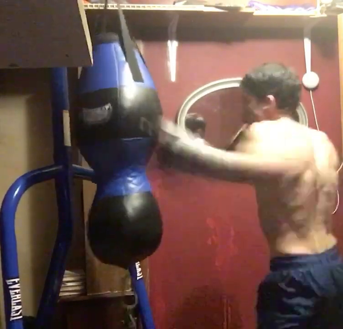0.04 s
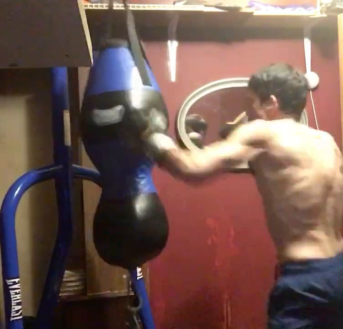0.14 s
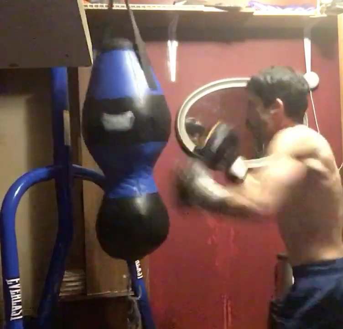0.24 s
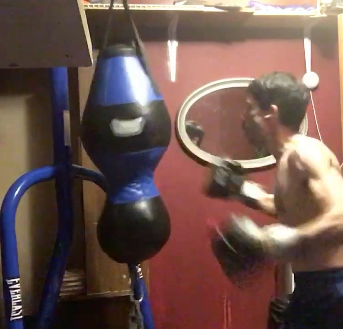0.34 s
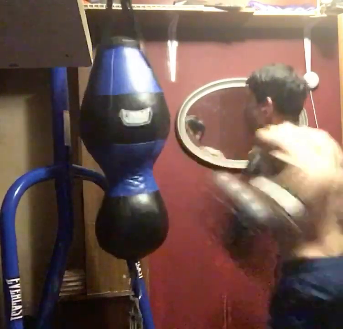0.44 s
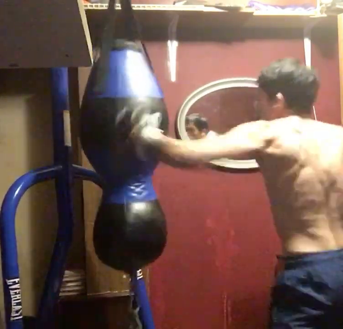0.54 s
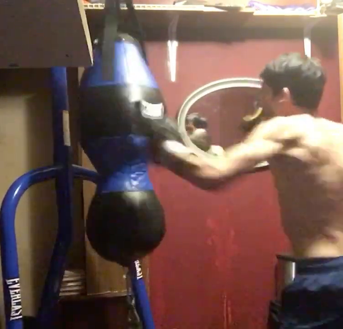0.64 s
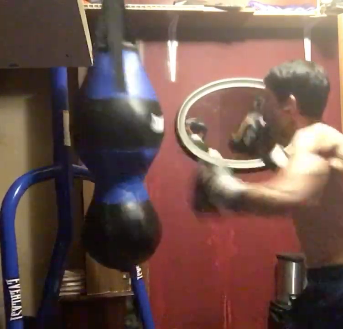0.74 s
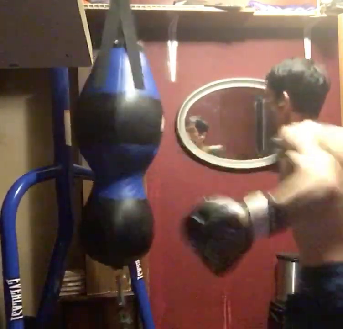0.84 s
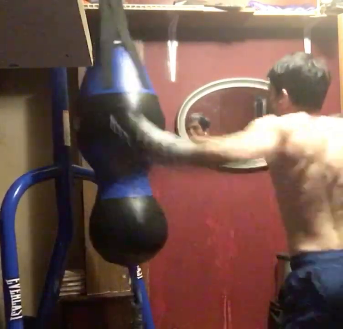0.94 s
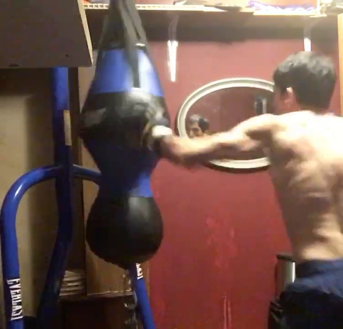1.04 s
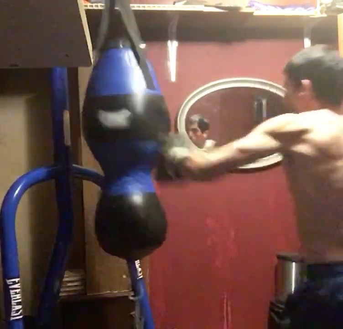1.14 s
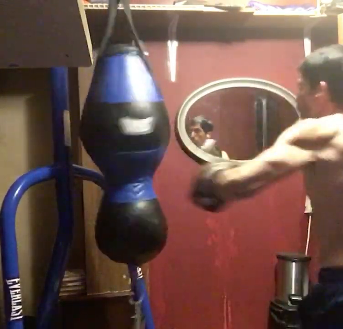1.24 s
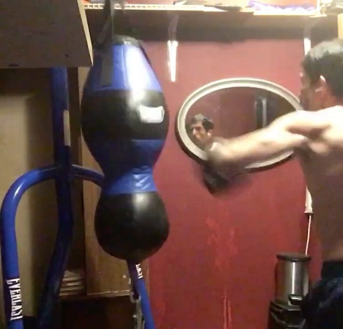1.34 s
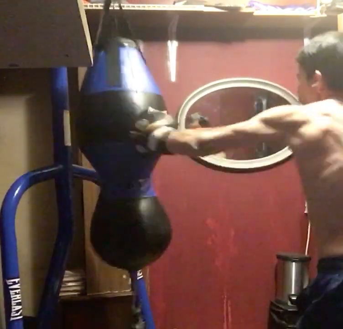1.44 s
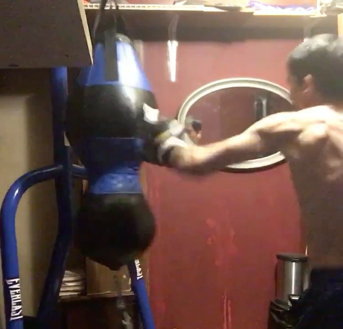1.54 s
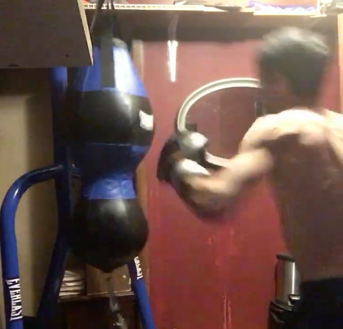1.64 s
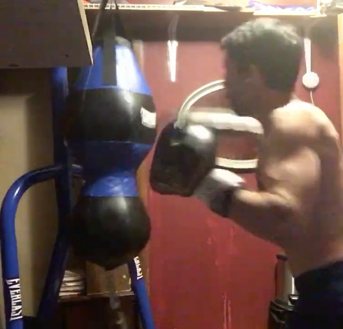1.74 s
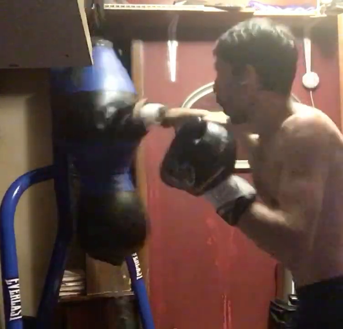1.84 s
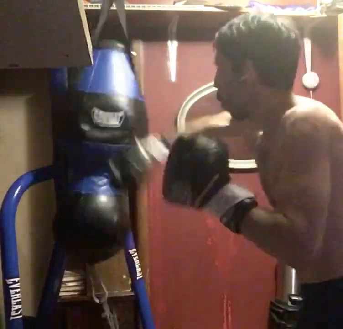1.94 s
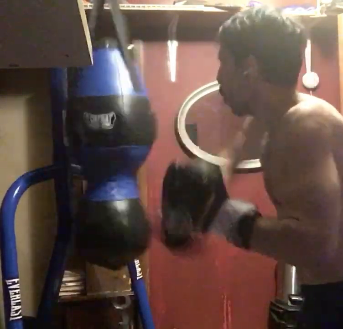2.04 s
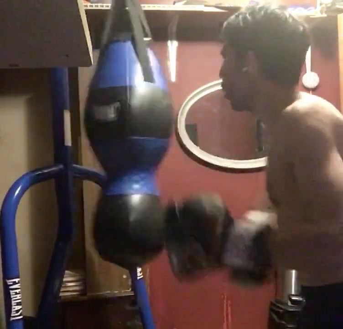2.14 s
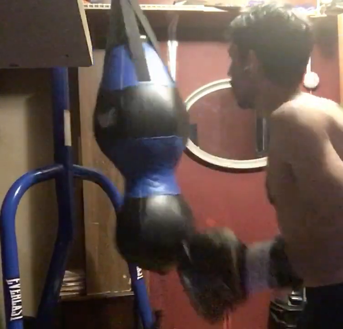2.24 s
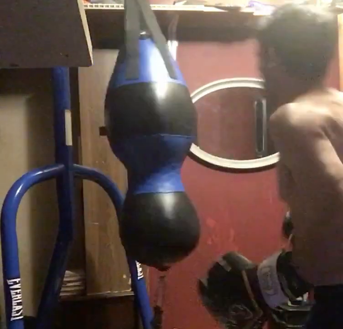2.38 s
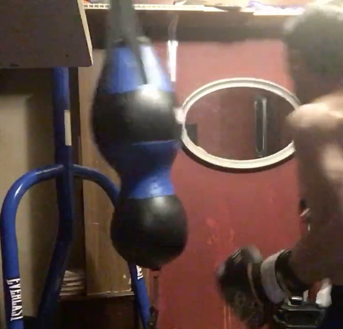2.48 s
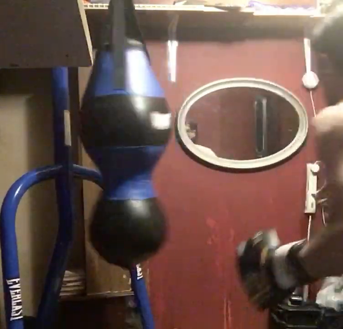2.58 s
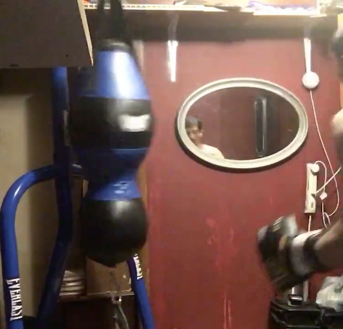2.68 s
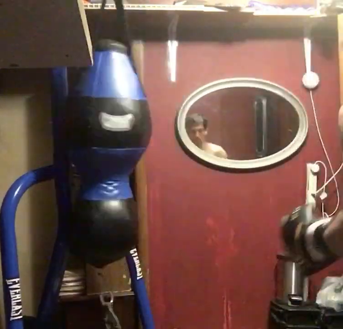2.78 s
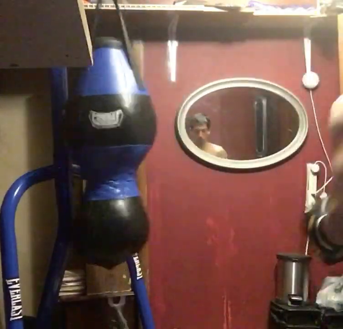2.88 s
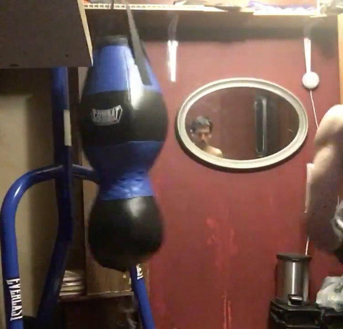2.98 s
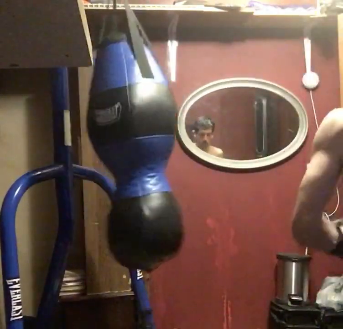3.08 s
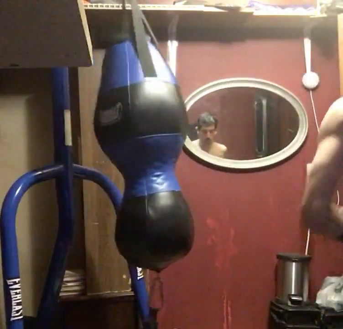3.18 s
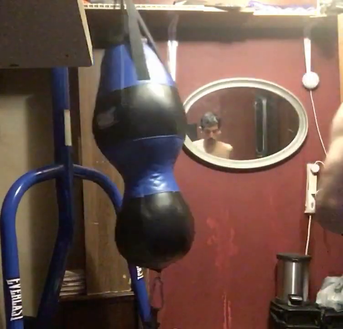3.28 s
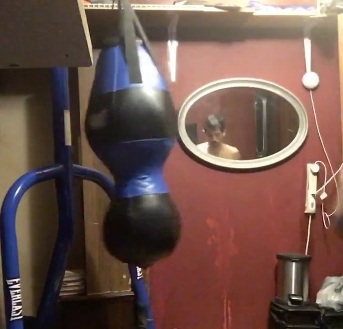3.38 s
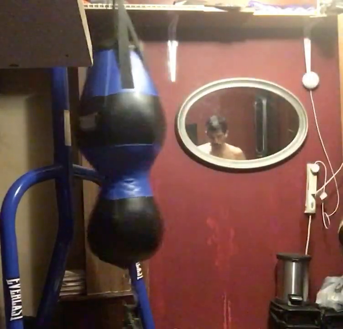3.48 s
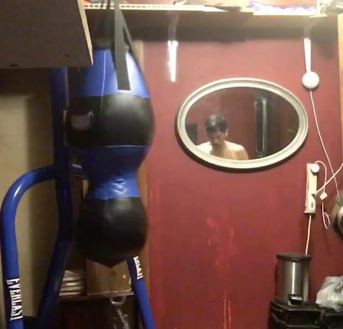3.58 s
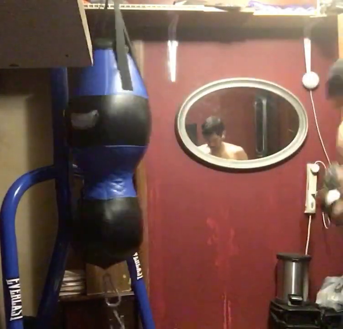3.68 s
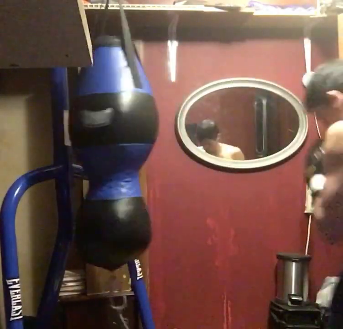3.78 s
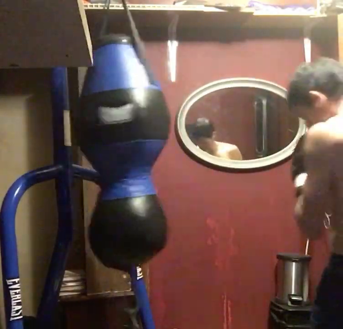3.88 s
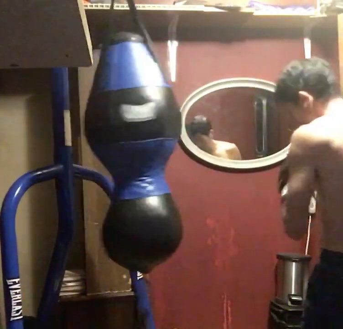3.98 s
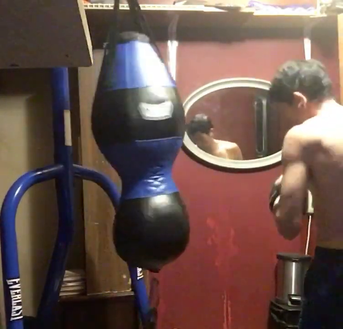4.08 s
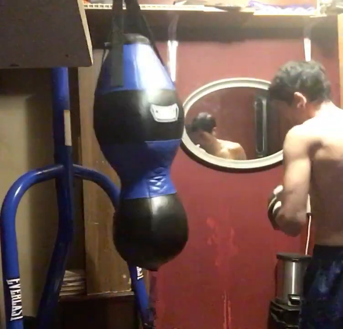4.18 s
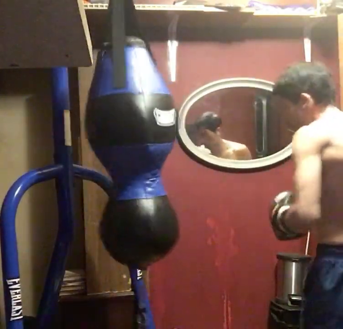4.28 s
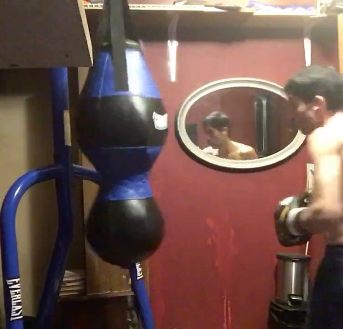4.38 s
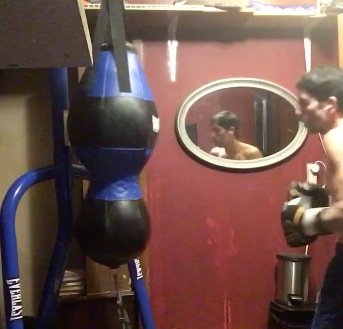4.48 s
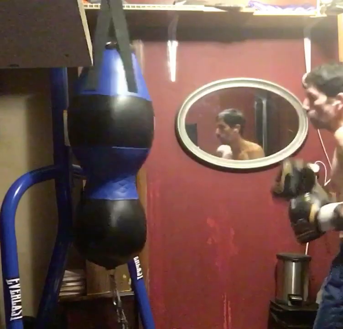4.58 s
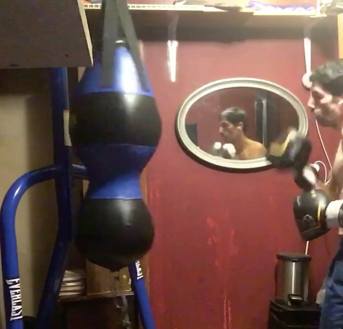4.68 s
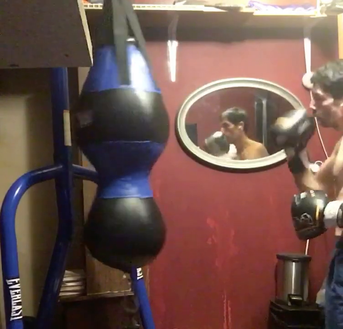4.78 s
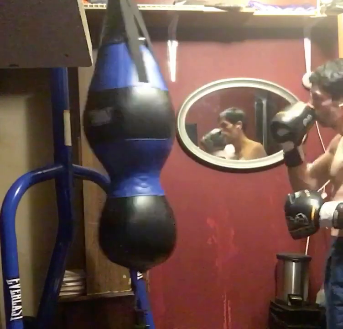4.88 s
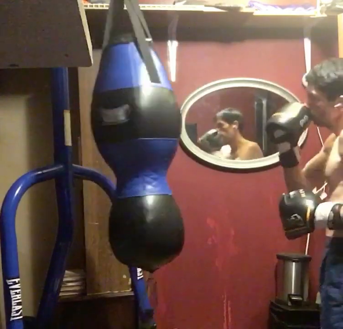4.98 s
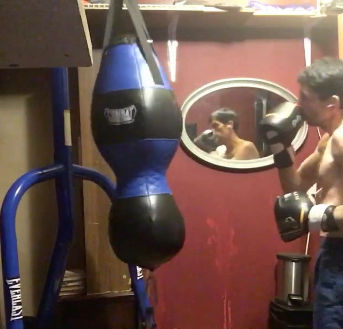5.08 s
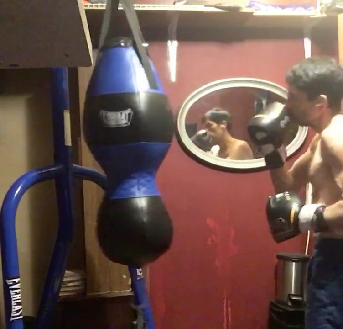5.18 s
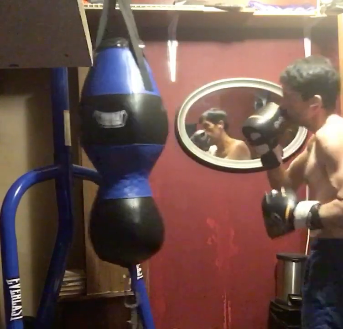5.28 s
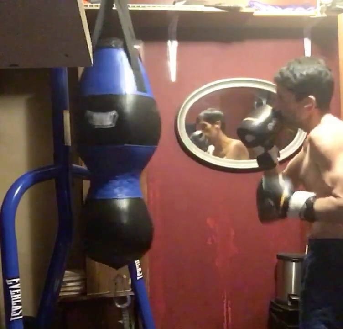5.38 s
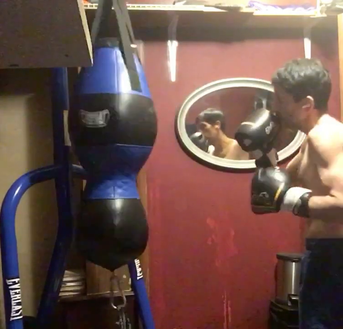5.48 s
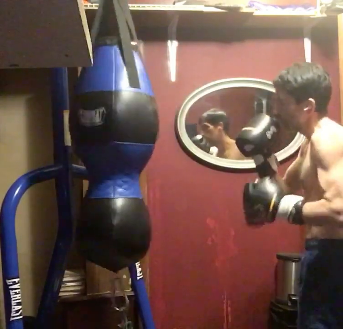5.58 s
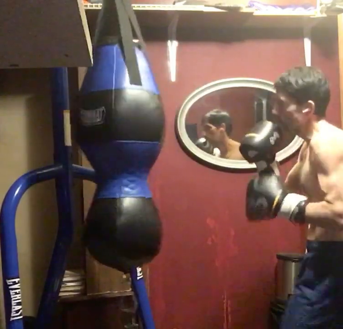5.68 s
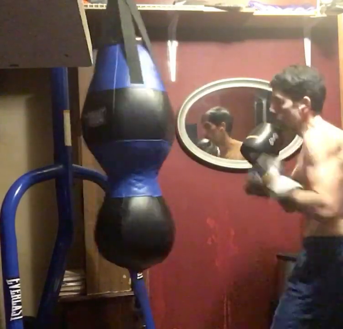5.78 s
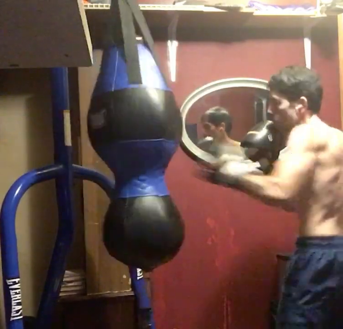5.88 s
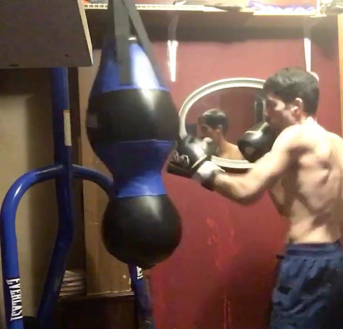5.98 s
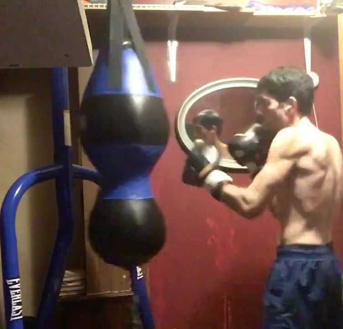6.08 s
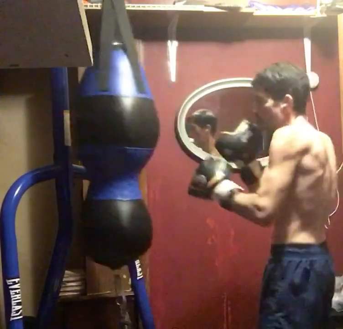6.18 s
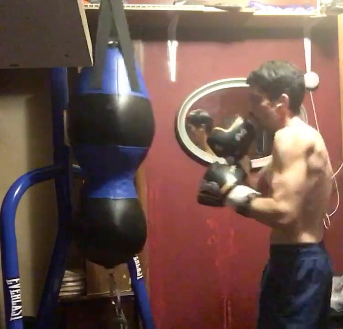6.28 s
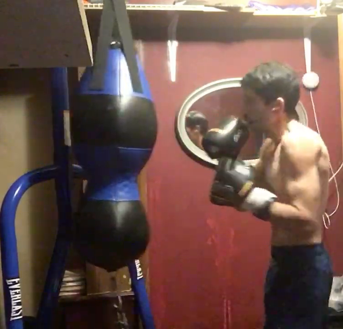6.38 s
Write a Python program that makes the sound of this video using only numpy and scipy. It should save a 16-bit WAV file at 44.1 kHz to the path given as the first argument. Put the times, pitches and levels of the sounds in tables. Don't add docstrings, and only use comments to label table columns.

```python
import sys
import numpy as np
from scipy import signal
from scipy.fft import rfft, irfft
from scipy.io import wavfile

SR = 44100
rng = np.random.default_rng(int(sys.argv[2]) if len(sys.argv) > 2 else 0)


def pcm_store(signal):
    levels = np.round(np.clip(np.atleast_2d(signal), -1, 1) * 32767)
    wavfile.write(sys.argv[1], SR, levels.astype(np.int16).T)


def level_to_linear(level):
    exponent = np.asarray(level, float) / 20
    return 10 ** exponent


N = 283563
EDGE_HZ = 15800


def evened(x):
    return x / np.sqrt(np.mean(x ** 2) + 1e-20)


def read(points, hz):
    f, value = np.transpose(points)
    return np.interp(np.log(hz + 1), np.log(f + 1), value)


def add(mix, s, sound):
    part = mix[round(s * SR):][:len(sound)]
    part += sound[:len(part)]


def coloured(x, *spectra):
    hz = np.fft.rfftfreq(len(x), 1 / SR)
    gain_db = sum(read(s, hz) for s in spectra)
    return evened(irfft(rfft(x) * level_to_linear(gain_db), len(x)))


def wander(size, hz):
    noise = rng.standard_normal(size + 2000)
    slow = signal.lfilter([1], [1, -np.exp(-2 * np.pi * hz / SR)], noise)
    return evened(slow[2000:])


def crackle(size, spread_db):
    return rng.standard_normal(size) * level_to_linear(spread_db * wander(size, 390))


def ring(modes, seconds):
    t = np.arange(round(seconds * SR)) / SR
    return sum(level_to_linear(db - 60 * t / t60) * np.sin(2 * np.pi * (hz * t + rng.random())) for hz, db, t60 in modes)


def stroke(length, level_db, peak, rise_db, fade_db):
    u = np.linspace(0, 1, round(length * SR))
    return u, level_db - np.interp(u, [0, peak, 1], [rise_db, 0, fade_db])


# (pitch [Hz], level [dB per Hz])
HUM_COLOUR = [(15, -35.5), (25, 5.5), (66, 5), (117, 2), (175, -15.5), (249, -2.5), (516, -14.5),
              (677, -16.5), (988, -23.5), (1290, -19), (1940, -18), (4610, -22.5), (7510, -29.5),
              (14400, -24), (16000, -33.5)]


def house_hum():
    level_db = -59 + 2.7 * wander(N, 1)
    return level_to_linear(level_db) * coloured(rng.standard_normal(N), HUM_COLOUR)


# (time [s], effort [dB])
EFFORT = [(0, -39), (.55, -43.5), (.86, -44), (1.15, -49), (1.48, -51), (1.72, -66), (1.86, -43.5),
          (2.15, -46.5), (2.5, -55.5), (2.75, -49.5), (2.93, -56), (3.4, -53.5), (4.05, -66.5), (4.6, -67),
          (5.2, -54), (5.75, -62), (6.0, -60), (6.43, -70.5)]
# (pitch [Hz], level [dB per Hz])
CLOTH_COLOUR = [(88, -24), (150, -4), (522, -9.5), (710, -4.5), (787, -10), (1420, -8.5), (1870, -14),
                (5000, -18), (6500, -51), (11000, -120)]
# (pitch [Hz], level [dB per Hz])
RUSTLE_COLOUR = [(1500, -30), (3000, 3), (5000, 3.5), (6500, 2), (10500, -2), (13000, -2.5), (16000, 1)]


def moves():
    t = np.arange(N) / SR
    effort_db = np.interp(t, *np.transpose(EFFORT))
    shiver = np.zeros(N)
    for s, slap_db, *_ in PUNCHES:
        shiver += level_to_linear(slap_db - 20.5) * np.exp(-np.maximum(t - s, 0) / 0.045) * (t > s)
    low_level = level_to_linear(0.85 * effort_db - 12 + 2.23 * wander(N, 6.1))
    low = low_level * coloured(crackle(N, 1.16), CLOTH_COLOUR)
    high_level = (level_to_linear(1.096 * effort_db + 1) + shiver) * level_to_linear(1.4 * wander(N, 29))
    return low + high_level * coloured(crackle(N, 2.1), RUSTLE_COLOUR)


def swish(slap_db):
    t = np.arange(round(.02 * SR)) / SR
    noise = coloured(rng.standard_normal(len(t)), STRAP_COLOUR, [(4000, -13), (7000, -13)])
    return level_to_linear(slap_db - 60 + 1830 * t) * noise


# (time [s], slap level [dB], thud level [dB], contact [s], extra body level [dB])
PUNCHES = [
    (0.007, -5, -17.5, 0.0069, 1),
    (0.465, -2, -18.5, 0.0069, -0.5),
    (0.909, -3, -18.5, 0.0079, -2),
    (1.344, -11.5, -22.5, 0.0049, -4.5),
    (1.683, -2, -19, 0.0034, -0.5),
    (5.834, -16.5, -34.5, 0.0098, 6),
]
# (pitch [Hz], level [dB per Hz])
SLAP_COLOUR = [(240, -11), (400, -2), (496, -9), (949, -10.5), (1380, -10), (1680, -8.5), (1870, -13.5),
               (4730, -15.5), (10400, -17), (12900, -16), (16000, -17)]


def punch(s, slap_db, thud_db, contact, body_db):
    t = np.arange(round(.3 * SR)) / SR
    treble_db = -11.5 + 0.28 * slap_db
    balance = [(1200, body_db), (2200, 0.004), (5000, 0.0066), (8000, treble_db + 8)]
    slap = coloured(crackle(len(t), 1.96), SLAP_COLOUR, balance)
    shape = np.minimum(t / 0.00069, 1) * np.exp(-t / contact)
    return s, level_to_linear(slap_db - 2) * slap * shape


# (pitch [Hz], level [dB], dying time [s])
BAG_TONES = [(98.4, -6, 0.15), (224.5, -1, 0.21), (300, -0.5, 0.14), (375, -4.5, 0.11)]
# (pitch [Hz], level [dB per Hz])
STUFFING_COLOUR = [(24, -46), (40, -16), (86, -8.5), (144, -5.5), (222, -7.5), (399, -10.5), (483, -41),
                   (585, -21), (700, -21.5), (910, -50), (1540, -120)]
# (time [s], level [dB])
BUMPS = [
    (0.346, -39),
    (0.649, -43),
    (0.785, -46.5),
    (1.256, -48),
    (2.159, -49),
    (2.699, -58),
    (5.408, -51.5),
    (6.169, -62.5),
]


def thump(db):
    t = np.arange(round(.4 * SR)) / SR
    shell = np.zeros(len(t))
    for hz, level_db, t60 in BAG_TONES:
        turn = 2 * np.pi * hz * rng.uniform(0.96, 1.05) * t
        shell += level_to_linear(level_db - 75 * t / t60) * np.sin(turn)
    noise = rng.standard_normal(len(t))
    stuffing = coloured(noise, STUFFING_COLOUR, [(90, -4.5), (170, 2.5)]) * level_to_linear(-60 * t / 0.23)
    push = 1 + level_to_linear(-2) * np.exp(-t / 0.011)
    thud = (shell + stuffing) * (1 - np.exp(-t / 0.0013)) * push
    return level_to_linear(db + 0.5) * thud / np.sqrt(np.mean(thud[:1000] ** 2))


# (pitch [Hz], level [dB], dying time [s])
CHAIN_TONES = [(710, -30.5, 0.99), (4400, -19, 0.29), (5600, -5, 0.075), (1430, -42, 0.265)]


def ringing_steel(blows):
    return level_to_linear(-28.5) * signal.fftconvolve(blows, ring(CHAIN_TONES, 0.75))[:N]


# (pitch [Hz], dying time [s])
ROOM_TIMES = [(100, 0.66), (260, 0.23), (700, 0.22), (1840, 0.25), (4850, 0.25), (12800, 0.2)]


def room(x):
    taps = np.zeros(SR // 2)
    at = np.arange(120, len(taps) - 20, 20)
    taps[at + rng.integers(0, 20, len(at))] = rng.choice([-1., 1.], len(at))
    hz, t, z = signal.stft(taps, SR, nperseg=256)
    fading = z * level_to_linear(-60 * t / read(ROOM_TIMES, hz)[:, None])
    tail = signal.istft(fading, SR, nperseg=256)[1]
    return signal.fftconvolve(x, tail / np.linalg.norm(tail))[:N]


# (time [s], peak level [dB], treble level re peak [dB], rattle length [s], loudest pitch [Hz])
JERKS = [(0.0974, -21, 0, 0.04, 5160), (0.5916, -23, -6.5, 0.016, 3820), (0.8884, -26, -6, 0.036, 1450),
         (1.204, -33.5, -4, 0.038, 3180), (1.591, -43, 0, 0.037, 5400), (1.759, -15, -5.5, 0.021, 4400),
         (2.22, -13.5, -4, 0.024, 3480), (2.602, -18, -9, 0.047, 3160), (2.961, -45, 10, 0.032, 4890),
         (3.233, -42, -14, 0.023, 4400), (4.1104, -40, -15, 0.017, 4600), (4.191, -41, -4, 0.016, 4670),
         (6.023, -31, -2, 0.011, 2500)]
STRAPS = [(0.2228, -29, -21, 0.024, 3520), (0.3377, -22.5, 3.5, 0.048, 4870), (0.635, -20, 2, 0.039, 3920),
          (0.777, -28.5, 7.5, 0.023, 4610), (1.0394, -34, 1, 0.027, 4900), (1.2447, -29, 1, 0.031, 3200),
          (1.9314, -17, -7, 0.04, 3120), (2.15, -30, -3.5, 0.07, 3200), (2.1913, -15, -4, 0.02, 3200),
          (3.697, -43.5, -3, 0.035, 4800), (3.866, -48, 5, 0.021, 4720), (4.7324, -45.5, -5.5, 0.026, 2950),
          (5.002, -45, -34, 0.011, 5100), (5.4084, -35, -13.5, 0.021, 1080),
          (6.138, -47, -7.5, 0.011, 4130), (6.275, -53, -10.5, 0.018, 2930), (3.103, -39, -10, 0.02, 2500)]
TICKS = [
    (2.835, -38.5, -5, 0.016, 3300),
    (4.605, -38, -2, 0.0064, 3120),
]
# (pitch [Hz], level [dB per Hz])
STRAP_COLOUR = [(240, -35.5), (400, -14.5), (730, -1.5), (1030, -8.5), (1220, 2), (2320, -3.5), (2750, -6),
                (3310, -2), (5190, -2.5), (5780, -12), (10200, -12), (12500, -8), (16000, -12.5)]


def snap(s, peak_db, treble_db, length, hz, low_db, ring_db):
    t = np.arange(round(.3 * SR)) / SR
    shape = np.minimum(t / (0.12 * length), 1) * np.exp(-(t / length) ** 1.9)
    rattle = shape * crackle(len(t), 1.7)
    links = ring([(link_hz, 0, .03) for link_hz in 1500 * 8 ** rng.random(10)], .1)
    rattle += level_to_linear(-40) * signal.oaconvolve(rattle, links)[:len(t)]
    balance = [(700, low_db + 14), (1800, 0.044), (5500, 0.0014), (7500, treble_db + 11.5),
               (12500, treble_db + 8)]
    pitch = [(hz / 1.6, 0), (hz, ring_db), (hz * 1.2, 0)]
    burst = coloured(rattle, STRAP_COLOUR, balance, pitch)
    return s, level_to_linear(peak_db - 7.5) * burst * np.sqrt(np.mean(shape ** 2))


# (time [s], length [s], level [dB], first pitch [Hz], last pitch [Hz])
HOOK_JOLTED = [
    (.1, 0.056, -34, 5300, 4940),
    (.35, 0.029, -41.5, 4800, 4430),
    (.64, 0.082, -36.5, 4760, 4780),
    (.78, 0.056, -39, 4550, 4400),
    (1.0, .08, -41, 4900, 4500),
    (2.03, 0.079, -45, 4840, 4990),
    (3.93, .08, -54.5, 4720, 4490),
    (3.93, .07, -59, 4290, 4280),
]
HOOK_STEADY = [
    (2.455, 0.12, -38, 5140, 5170),
    (2.865, .13, -43, 4840, 4830),
    (2.9, .07, -47, 4800, 4340),
    (3.705, .17, -40.5, 4880, 4590),
    (4.14, 0.19, -43, 4740, 4610),
    (2.335, 0.073, -47.5, 4880, 4600),
    (5.8, .036, -48, 4700, 3900),
    (2.04, 0.072, -50, 4200, 4950),
]
HOOK_HIGH = [
    (2.505, .085, -54, 6000, 5930),
    (3.18, .065, -52, 5830, 5900),
]


def hook(s, length, level_db, first_hz, last_hz, wobble, octave_db):
    u, level_db = stroke(length, level_db, .3, 7, 14)
    hz = (first_hz + (last_hz - first_hz) * u) * (1 + .008 * np.sin(np.pi * u))
    turn = 2 * np.pi * np.cumsum(hz * (1 + wobble * wander(len(hz), 300))) / SR
    grip = level_to_linear(level_db + 1.5 + 3.4 * wander(len(hz), 60)) * signal.windows.tukey(len(hz), .2)
    third = level_to_linear(-6) * np.sin(3 * turn) * (3 * hz < EDGE_HZ)
    return s, grip * (np.sin(turn) + level_to_linear(octave_db) * (np.sin(2 * turn) + third))


# (time [s], length [s], level [dB], pitch [Hz], overtone tilt [dB per partial])
FEET = [
    (.22, 0.089, -44.5, 715, 0),
    (.33, 0.12, -38, 695.4, -10),
    (1.76, 0.048, -43, 718.6, 1.5),
    (2.19, .11, -39, 885, 2.5),
    (2.83, 0.28, -50.5, 699, -14.5),
    (3.73, 0.11, -52, 677, 0.5),
    (3.82, .17, -48, 672, -10),
    (4.215, 0.147, -50, 788, -4.5),
    (4.35, .19, -51, 810, -12),
]


def creak(s, length, level_db, top_hz, tilt_db):
    u, level_db = stroke(length, level_db, 0.45, 3.5, 9)
    hz = top_hz * (1 - 0.023 * (2 * u - 1) ** 2)
    turn = 2 * np.pi * np.cumsum(hz * (1 + 0.0279 * wander(len(hz), 85))) / SR
    slope_db = tilt_db - 3.5 * u
    stack = np.zeros(len(u))
    for k in range(7):
        stack += level_to_linear(slope_db * min(k, 4) - 9 * max(k - 4, 0)) * np.sin((k + 1) * turn)
    grip = level_to_linear(level_db - 1 + 3.3 * wander(len(hz), 23.2))
    return s, grip * stack * signal.windows.tukey(len(hz), .2)


# (time [s], length [s], level [dB])
CHAIN_RINGS = [
    (1.84, .04, -46),
    (1.885, 0.04, -46),
    (2.3, .26, -57),
    (2.68, .18, -55),
]


def chain_ring(s, length, level_db):
    u, level_db = stroke(length, level_db, 0.18, 3, 9)
    turn = 2 * np.pi * np.cumsum(3630 * (1 + 0.0031 * wander(len(u), 60))) / SR
    grip = level_to_linear(level_db + 5.5 + 3.8 * wander(len(u), 30))
    return s, grip * np.sin(turn) * signal.windows.tukey(len(u), .2)


# (time [s], length [s], level [dB], share of length before the peak [0-1])
STEPS = [
    (3.68, 0.31, -44.5, 0.32),
    (4.2, 0.11, -52.5, .1),
    (4.37, .15, -53, 0.49),
    (4.76, .33, -41.5, 0.39),
    (6.06, 0.153, -54.5, .55),
    (6.22, 0.12, -56.5, .55),
]
# (pitch [Hz], level [dB per Hz])
SCUFF_COLOUR = [(180, -45), (300, -6), (399, -10), (441, -10.5), (629, -0.5), (767, -9), (1180, -3),
                (2360, -8.5), (2840, -16), (3570, -13), (9000, -25.5), (11700, -58), (19800, -120)]


def step(s, length, level_db, peak):
    u, level_db = stroke(length, level_db, peak, 17, 25)
    grains = coloured(crackle(len(u), 2.4), SCUFF_COLOUR)
    return s, level_to_linear(level_db - 4) * grains * signal.windows.tukey(len(u), .2)


def scene():
    slaps, thuds, snaps, squeaks = np.zeros((4, N))
    for row in PUNCHES:
        s, slap = punch(*row)
        add(slaps, s, slap)
        add(slaps, max(s - .02, 0), swish(row[1]))
        add(thuds, s, thump(row[2]))
    for s, db in BUMPS:
        add(thuds, s, thump(db))
    for rows, low_db, ring_db in (STRAPS, -9, 5), (JERKS, -20, 6), (TICKS, -30, 13):
        for row in rows:
            add(snaps, *snap(*row, low_db, ring_db))
    for rows, wobble, octave_db in (HOOK_STEADY, .0108, -11), (HOOK_HIGH, .0108, -2), (HOOK_JOLTED, .048, -13):
        for row in rows:
            add(squeaks, *hook(*row, wobble, octave_db))
    for rows, source in (FEET, creak), (CHAIN_RINGS, chain_ring), (STEPS, step):
        for row in rows:
            add(squeaks, *source(*row))
    links = ringing_steel(snaps + level_to_linear(-9) * slaps)
    blend = np.sin(np.arange(N) / SR * 3.6) ** 2
    sent = level_to_linear(-2.5) * slaps + level_to_linear(-1.5) * snaps + level_to_linear(-5) * squeaks + level_to_linear(-12.5) * thuds
    wet = room(sent * np.sqrt(blend)) + room(sent * np.sqrt(1 - blend))
    direct = level_to_linear(-2) * (slaps + snaps) + thuds + squeaks + links
    return (direct + wet + moves() + house_hum())[None]


def low_pass(x):
    return signal.sosfilt(signal.butter(12, 16980, fs=SR, output="sos"), x)


def record(dry):
    dry = signal.sosfilt(signal.butter(3, 55, "highpass", fs=SR, output="sos"), dry)
    dry = 1.5 * np.tanh(dry / 1.5)
    lowpass = signal.firwin(401, EDGE_HZ, window=("kaiser", 6), fs=SR)
    limited = signal.oaconvolve(dry, lowpass[None], "same")
    mix = limited + level_to_linear(-43) * dry
    return low_pass(mix)


dry = scene()
out = record(dry)
pcm_store(out)
```